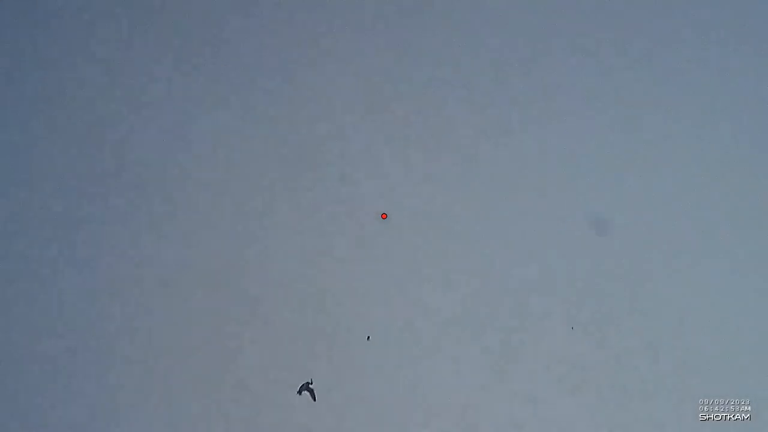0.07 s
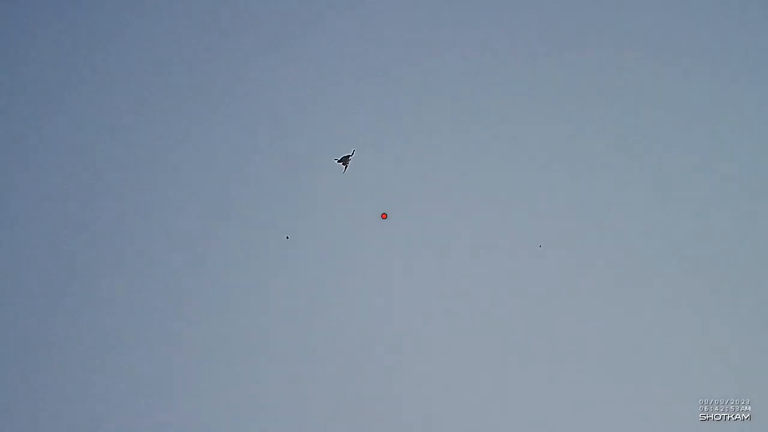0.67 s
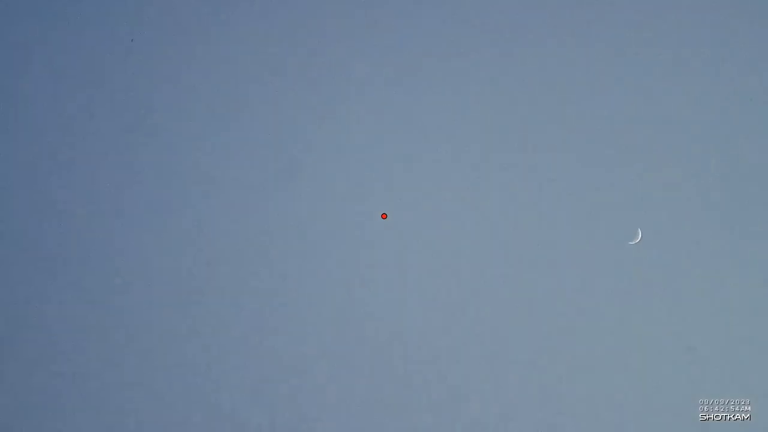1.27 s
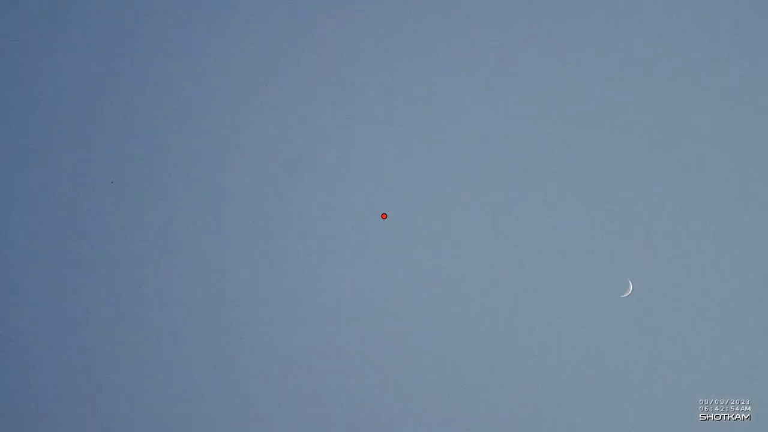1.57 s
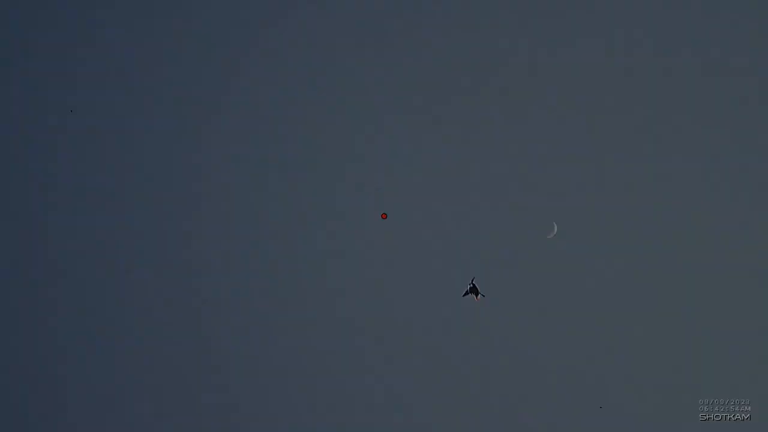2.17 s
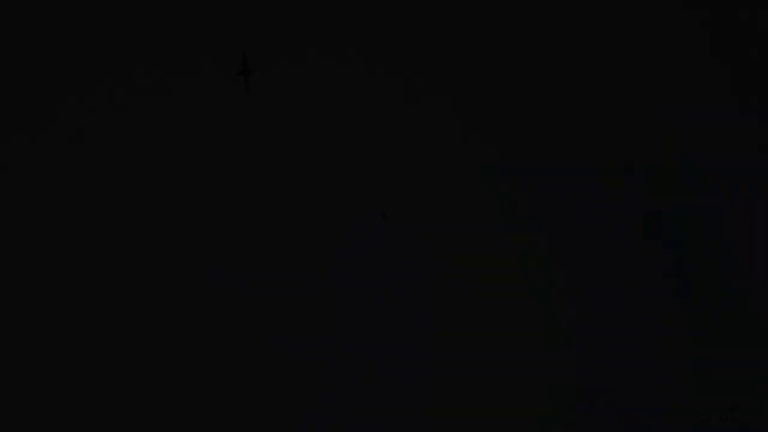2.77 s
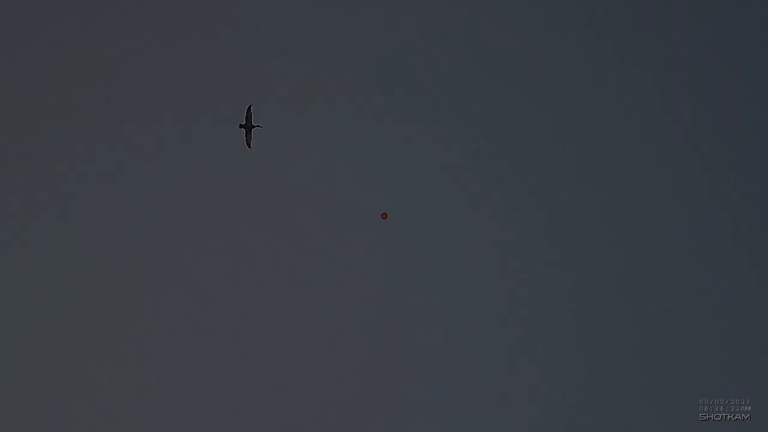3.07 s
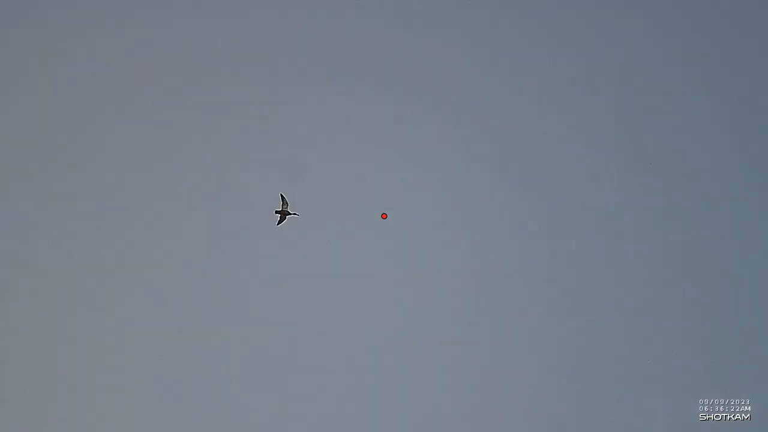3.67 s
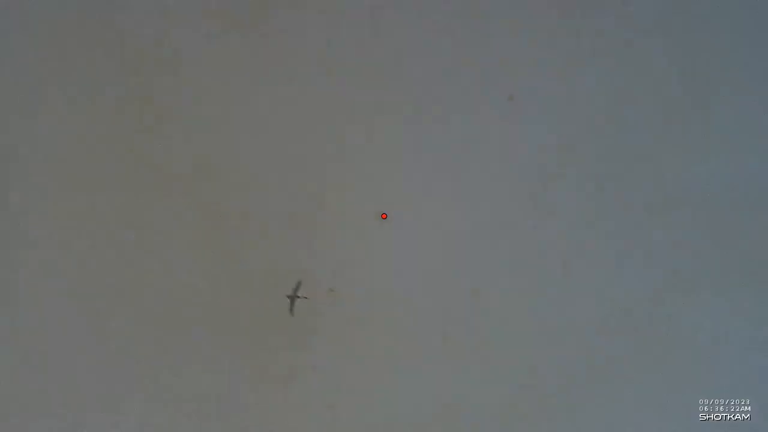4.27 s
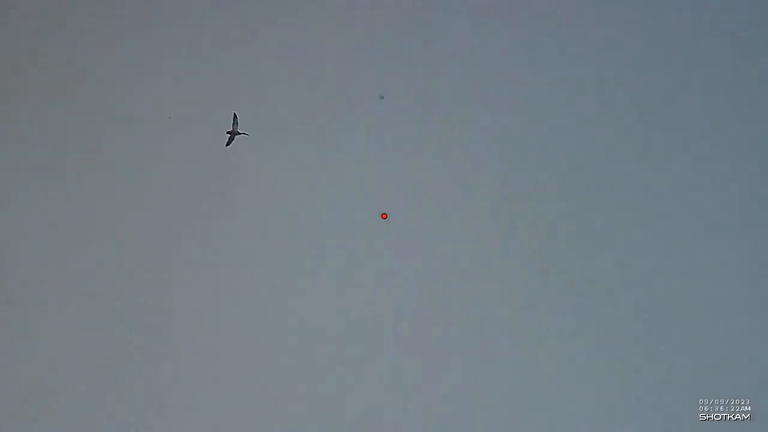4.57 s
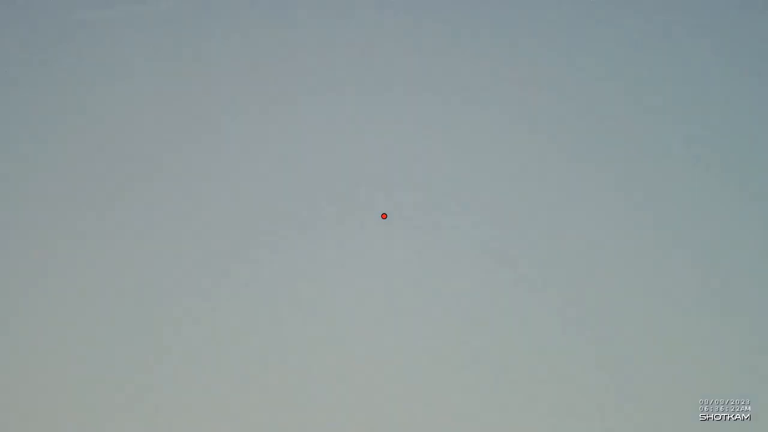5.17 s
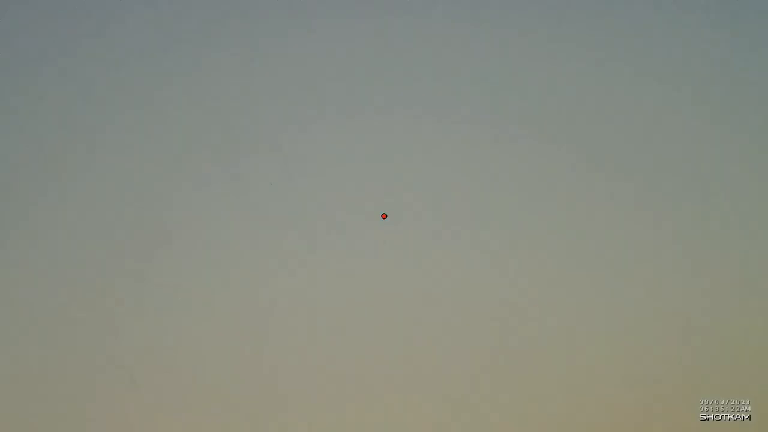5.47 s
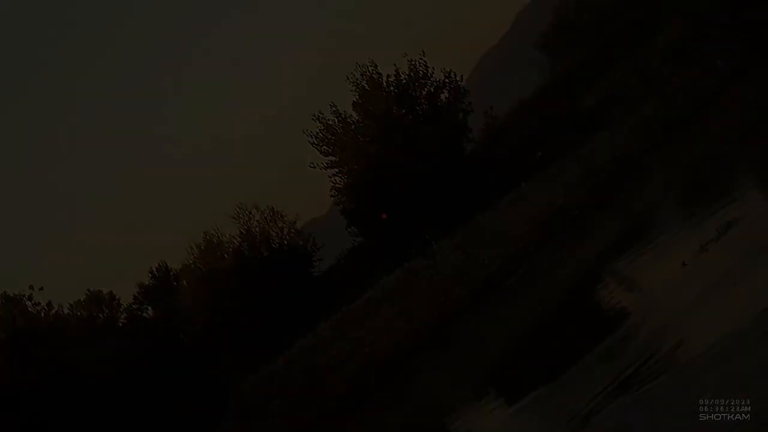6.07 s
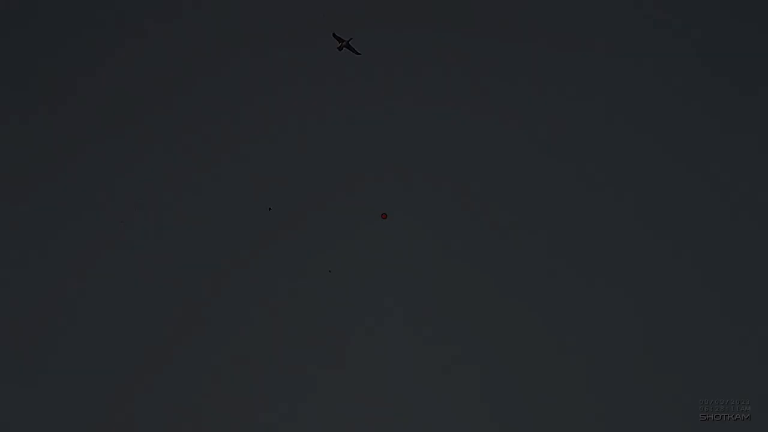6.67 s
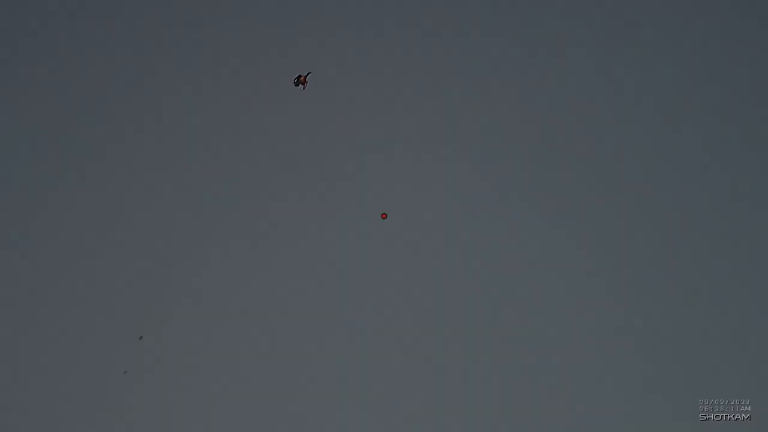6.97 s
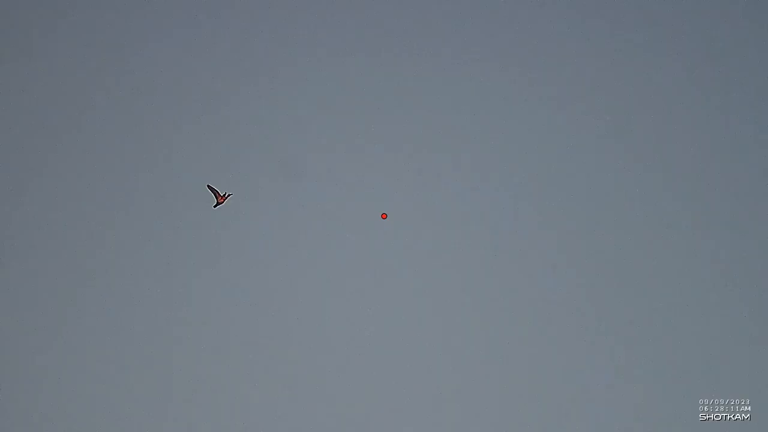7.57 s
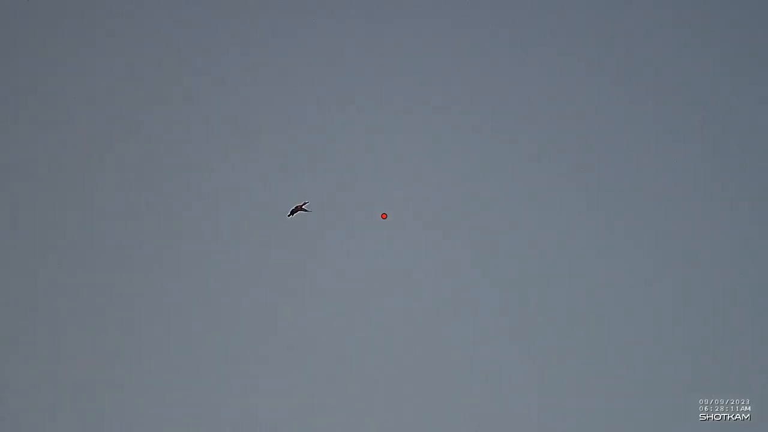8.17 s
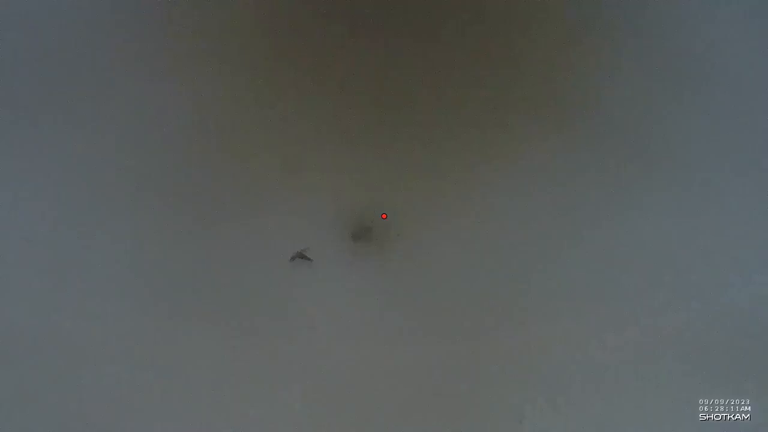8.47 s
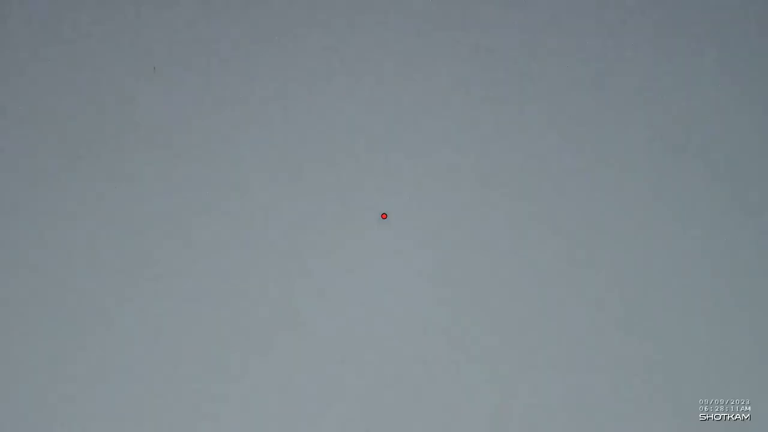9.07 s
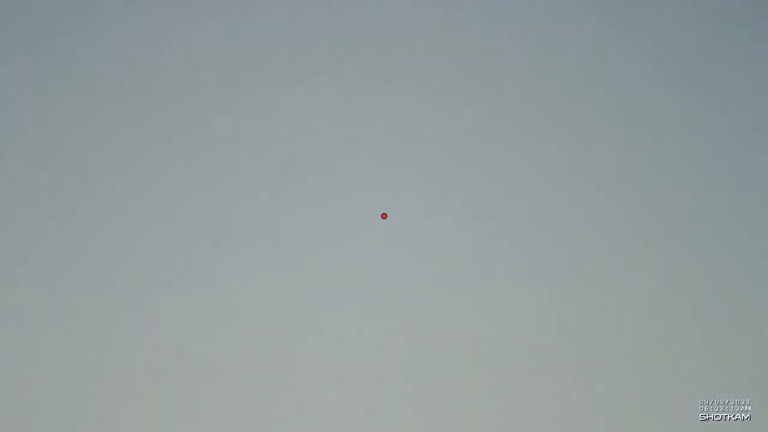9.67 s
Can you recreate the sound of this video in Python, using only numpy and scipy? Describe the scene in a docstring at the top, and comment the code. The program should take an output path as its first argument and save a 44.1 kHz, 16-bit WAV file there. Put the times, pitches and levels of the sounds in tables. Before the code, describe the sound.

In quiet open country, a shot's tail dies away with a thin steel ring. Another gun booms nearby and far guns thud. After a brief fade, a close shotgun blast overloads the barrel-mounted microphone, the action clacks and echoes roll away. Hands knock and click on the gun. Following another fade come a nearby shot, a second close blast and one last nearby boom.

```python
"""Open country during a bird shoot, heard from a small camera clamped to a shotgun barrel.
Over quiet air, far guns thud and shots roll across the land. Hands knock and click on the gun,
and other guns nearby boom through the camera housing. The gun's own three blasts overload the
microphone, cycle the action and leave a thin steel ring. Twice the sound fades out and cuts back in."""
import sys
import numpy as np
from scipy import signal
from scipy.fft import rfft, irfft
from scipy.io import wavfile

SR = 44100
rng = np.random.default_rng(int(sys.argv[2]) if len(sys.argv) > 2 else 0)


def master(y):
    """Save y as 16-bit WAV."""
    cut = np.clip(np.atleast_2d(y).T, -1, 1)
    pcm = np.round(cut * 32767)  # scale
    wavfile.write(sys.argv[1], SR, pcm.astype(np.int16))


N = 437472
TIME = np.arange(N) / SR


def from_db(db):
    """Decibels to gain."""
    return 10 ** (np.asarray(db) / 20)


def unit_rms(x):
    """Scale to rms 1."""
    return x / np.sqrt(np.mean(x ** 2) + 1e-20)


def add(out, start, sound):
    """Mix a sound in at a start time in seconds."""
    at = round(start * SR)
    first, last = max(at, 0), min(at + len(sound), N)
    if last > first:
        out[first:last] += sound[first - at:last - at]


def decay(t, t60):
    """Exponential fall, 60 dB in t60 seconds."""
    return np.exp(-np.log(1000) * t / t60)


def bursts(rows, rise):
    """Envelope of events (start, dB, t60) that swell with time constant rise and die away."""
    out = np.zeros(N)
    for start, db, t60 in rows:
        t = TIME[:int(2 * t60 * SR)]
        add(out, start, from_db(db) * (1 - np.exp(-t / rise)) * decay(t, t60))
    return out


def dull(x, hz):
    """Two-pole low-pass."""
    return signal.sosfilt(signal.butter(2, hz, fs=SR, output="sos"), x + 1e-18)


def resonance(x, hz, width):
    """Two-pole resonance with gain 1 at its peak."""
    radius = np.exp(-np.pi * width / SR)
    feedback = [1, -2 * radius * np.cos(2 * np.pi * hz / SR), radius ** 2]
    return signal.lfilter(np.array([1, 0, -1]) * (1 - radius ** 2) / 2, feedback, x + 1e-18)


# Noise colours: deep rumble, midrange body, bright crack. Each row: frequency in Hz, relative level in dB.
RUMBLE = [(12, -4.5), (30, 1), (55, 2), (120, -4), (200, -22.5), (500, -60)]
MIDRANGE = [(500, -9.5), (850, 7.5), (1200, 5), (1500, -3.5), (2100, -3), (3000, -19.5), (4500, -31),
            (7500, -44)]
CRACK = [(300, -7), (700, 0.5), (1300, -5.5), (2500, -12.5), (4200, -16.5), (5800, -26), (7000, -25),
         (8200, -43)]

def noise(spectrum):
    """Noise of the given colour, rms 1."""
    hz, db = np.transpose(spectrum)
    bins_hz = np.maximum(np.fft.rfftfreq(N, 1 / SR), 1)
    gain = from_db(np.interp(np.log(bins_hz), np.log(hz), db))
    return unit_rms(irfft(rfft(rng.standard_normal(N)) * gain, N))


# The boxy tone of the camera housing. Each row: pitch in Hz, width in Hz, gain in dB.
HOUSING_MODES = [(111, 28, -25.5), (213, 28, 14.5), (283, 19, -9.5), (632, 51, 6.5), (787, 37, -21.5),
                 (1213.7, 30, -25), (1970, 48, -30.5), (2750, 100, -35), (3520, 310, -47),
                 (5070, 3300, -44.5)]

def housing(x):
    """Airborne sound reaches the microphone through the housing's resonances."""
    return sum(from_db(db) * resonance(x, hz, width) for hz, width, db in HOUSING_MODES)


def boom(top_hz=3800):
    """Diffuse sound heard through the housing, rms 1."""
    return unit_rms(dull(housing(rng.standard_normal(N)), top_hz))


# The housing's hollow mids. Each row: pitch in Hz, width in Hz, relative level in dB.
HOLLOW_MODES = [(654, 98, 0), (1140, 140, -8), (2020, 47, -11), (2750, 130, -19), (3520, 300, -27)]

def hollow():
    """Noise in the housing's middle resonances, mixed in alternating polarity, rms 1."""
    white = rng.standard_normal(N)
    return unit_rms(sum((-1) ** k * from_db(db) * resonance(white, hz, width)
                        for k, (hz, width, db) in enumerate(HOLLOW_MODES)))


# A soft bed of hiss. Each row: frequency in Hz, relative level in dB.
HISS = [(200, 4.5), (1500, -2), (3000, -3), (6000, -2.5), (7500, -6.5), (9000, -11.5)]
# Gusts as the barrel is swung or jolted. Each row: peak time in seconds, level in dB,
# half length in seconds.
SWINGS = [(.81, -39.5, 0.13), (1.105, -49.5, 0.061), (1.8, -47, 0.027), (5.484, -55.5, 0.17),
          (5.664, -43, 0.045), (6.967, -46.5, 0.028), (7.497, -63, 0.031), (9.55, -50, 0.048)]

def air(calm_db=-72, calm_mids_db=-85, breeze_db=-78, sway_db=-47, hiss_db=-79):
    """Quiet country air, wind pushing on the swinging barrel and a faint steady hiss."""
    calm = from_db(calm_db) * boom() + from_db(calm_mids_db) * noise(MIDRANGE)
    gusts = sum(from_db(db) * np.exp(-((TIME - peak) / half) ** 2) for peak, db, half in SWINGS)
    wind = (from_db(breeze_db) + gusts) * noise(RUMBLE)
    # slow pressure swells as the gun swings
    sway = from_db(sway_db) * noise([(1, 3), (4, -7), (10, -24), (30, -62.5), (100, -110)])
    return calm + wind + sway + from_db(hiss_db) * noise(HISS)


# Lingering roll of earlier shots, still sounding as the scene cuts back in.
# Each row: start in seconds, level in dB, swell in seconds.
LINGERING_ROLLS = [(2.8, -64, 0.32), (6.4, -55.5, .2), (6.95, -54, 0.29)]

def roll_envelope(t60, swell_s=.095):
    """The swell and fall of the sound that the land scatters back after a shot."""
    fresh = bursts([(start, db, t60) for start, *_, db in OWN_SHOTS + NEAR_SHOTS], rise=swell_s)
    return fresh + sum(bursts([(start, db, t60)], rise=swell) for start, db, swell in LINGERING_ROLLS)


# The flutter of unevenly arriving echoes. Each row: rate in Hz, relative depth in dB.
ROLL_FLUTTER = [(2, -8), (6, 0.5), (18, -3.5), (40, -30), (200, -87.5)]

def land_roll(low_t60=3.1, mids_t60=2.0, mids_top_hz=2400, flutter_db=1.5):
    """Shots roll unevenly over the country, dulled by distance; the mids die before the lows."""
    mids = from_db(-18) * noise(MIDRANGE) + from_db(-8) * hollow()
    mids = dull(dull(mids, mids_top_hz), mids_top_hz)
    lows = boom(top_hz=1500) + from_db(-8) * noise(RUMBLE)
    roll = roll_envelope(low_t60) * lows + roll_envelope(mids_t60) * mids
    return roll * from_db(flutter_db * noise(ROLL_FLUTTER))


# Far guns. Each row: start in seconds, level in dB.
FAR_SHOTS = [(1.099, -44.5), (1.226, -42.5), (1.787, -49.5), (2.34, -61.5), (3.028, -67.5), (3.12, -60),
             (5.578, -46), (9.508, -49.5)]
# The land's answer to each of the gun's own shots. Each row: delay in seconds,
# level in dB relative to the roll, swell in seconds, t60 in seconds.
ECHOES = [(0.383, 7.5, 0.044, 0.4), (.543, -1.5, 0.015, 0.23), (.85, -1.5, 0.11, 1.1)]

def far_thuds(shot_t60=.43, mids_db=-20):
    """Far guns and single echoes arrive as thuds, dulled by distance."""
    envelope = bursts([(start, db, shot_t60) for start, db in FAR_SHOTS], rise=.011)
    for delay, echo_db, swell, t60 in ECHOES:
        envelope += bursts([(start + delay, db + echo_db, t60) for start, *_, db in OWN_SHOTS], swell)
    body = unit_rms(resonance(boom(), hz=380, width=340))
    return envelope * (body + from_db(mids_db) * noise(MIDRANGE))


# Light steel clicks. Each row: start in seconds, level in dB before the trim.
CLICKS = [(0.2997, -48), (0.3267, -45), (0.9876, -37.5), (1.0044, -43), (1.122, -45.5), (1.321, -55),
          (3.63, -59.5), (4.6828, -41), (4.944, -58), (5.58, -43), (6.625, -57), (6.742, -64), (6.959, -30),
          (8.8964, -43), (9.3235, -39), (9.331, -38.5)]

def clicks(trim_db=-4, t60=.017, ring_hz=2900, ring_db=-26.5, ring_t60=.17):
    """Small steel parts tick with a bright, short chink and ring on faintly."""
    steel = noise([(900, -29), (2000, -6), (2800, -10.5), (3450, .5),
                   (4500, -18), (5500, -17.5), (7200, -27.5), (8500, -50)])
    chink = bursts([(start, db + trim_db, t60) for start, db in CLICKS], rise=.0012)
    ring = bursts([(start, db + ring_db, ring_t60) for start, db in CLICKS], rise=.0008)
    return chink * steel + ring * np.sin(2 * np.pi * ring_hz * TIME)


# Hands on the stock and action. Each row: start in seconds, relative level in dB, clink boost in dB.
HAND_KNOCKS = [(0.423, -43, 19), (0.595, -36, 13), (0.636, -48, 24), (0.663, -20, 9.5), (1.186, -40.5, 5),
               (3.055, -64, 8), (3.128, -61, 12), (4.892, -42.5, 12.5), (5.11, -38, 4), (5.213, -27.5, -7),
               (5.573, -39.5, 10), (5.659, -44, 19), (5.748, -41, 4.5), (6.13, -57.5, 0), (6.778, -50, 5.5),
               (6.954, -28, 8.5), (6.96, -28.5, 13.5), (7.493, -50.5, -1), (8.594, -49, 17),
               (9.193, -33, 0), (9.212, -38, 17), (9.453, -36.5, 4), (9.528, -40.5, 2)]

def hand_blows(grit_db=-11, t60=.032):
    """Hands knock on the gun: blows as (start, dB, clink dB, grit dB, t60)."""
    return [(start, db, clink_db, grit_db, t60) for start, db, clink_db in HAND_KNOCKS]


def housing_thumps(trim_db=-17, t60=.089):
    """Each knock of the hands also jolts the camera housing."""
    envelope = bursts([(start, db + trim_db, t60) for start, db, _ in HAND_KNOCKS], rise=.0029)
    return envelope * unit_rms(resonance(boom(), hz=160, width=300))


# The bolt slides back, hits its stop, rebounds, lifts a shell and closes. Each row: seconds from the
# microphone's release, relative level in dB, grit boost in dB.
ACTION_CYCLE = [(-.005, -22.5, 21), (0, -7, 7.5), (.007, -16.5, 27.5), (.028, -29.5, 24.5),
                (.045, -18.5, 16.5)]

def action_blows(clink_db=2.5, t60=.021):
    """The action cycles after each shot: blows as (start, dB, clink dB, grit dB, t60)."""
    return [(start + blocked + delay, db, clink_db, grit_db, t60)
            for start, _, blocked, *_ in OWN_SHOTS for delay, db, grit_db in ACTION_CYCLE]


# The clack of the knocked gun. Each row: pitch in Hz, relative level in dB, multiple of the blow's t60.
GUN_MODES = [(404, -6.5, 1.1), (553, 4.5, .9), (659.5, 1, 1.9), (753.6, 1, 2), (943, -14, .9),
             (1144.8, -16, 1), (1200, -16, 0.37), (1580, -8, 0.75), (1585, -9.5, 0.51), (1850, -22, .6),
             (2090, -20, 0.18), (2850, -13, 0.28), (3730, -23, .4)]

def gun_knocks(blows, trim_db=-7, centre_hz=760, clink_hz=1460, clink_octaves=.36, spread_db=.5,
               detune=.017, chatter=.28, chatter_per_s=2500, grit_trim_db=-17, grit_t60=.012):
    """A blow rings the gun and loose parts chatter; where it lands shifts each mode's level and pitch."""
    out, t = np.zeros(N), TIME[:SR // 5]
    hz, mode_db, t60_scale = np.transpose(GUN_MODES)[:, :, None]
    colour_db = mode_db - 4 * np.abs(np.log2(hz / centre_hz))  # 4 dB less per octave off centre
    steel_band = np.exp(-(np.log2(hz / clink_hz) / clink_octaves) ** 2)
    for start, db, clink_db, _, t60 in blows:
        strength = from_db(colour_db + clink_db * steel_band + spread_db * rng.standard_normal(hz.shape))
        pitch = hz * (1 + detune * rng.standard_normal(hz.shape))
        modes = strength * np.sin(2 * np.pi * (pitch * t + rng.random(hz.shape)))
        ringing = (modes * decay(t, t60 * t60_scale)).sum(axis=0) * (1 - np.exp(-t / .00017))
        touches = chatter * rng.standard_normal(len(t)) * decay(t, t60=.068)
        touches *= rng.random(len(t)) < chatter_per_s / SR
        touches[0] = 1  # the blow itself
        add(out, start, from_db(db + trim_db) * signal.fftconvolve(touches, ringing))
    grit = [(start, db + grit_db + grit_trim_db, grit_t60) for start, db, _, grit_db, _ in blows]
    return out + bursts(grit, rise=.0012) * noise(CRACK)


# Other guns nearby. Each row: start in seconds, pulse in dB ahead of the housing, ground bounce lag in
# seconds, crack in dB, tail in dB, tail t60 in seconds, roll in dB.
NEAR_SHOTS = [(0.8561, 26, .0045, -30, -26.5, 0.34, -43.5), (8.411, 17.5, .0045, -36.5, -37, 0.3, -50),
              (9.78, 32, 0.001424, -21, -14, 0.23, -33.5)]

def near_shots(crack_t60=.022, bounce_db=-6, pulse_top_hz=1900):
    """A pressure pulse, rounded by distance, and its ground bounce ring the housing; scatter follows."""
    pulses = np.zeros(N)
    for start, db, bounce_lag, *_ in NEAR_SHOTS:
        add(pulses, start, -from_db([db]))
        add(pulses, start + bounce_lag, -from_db([db + bounce_db]))
    crack = bursts([(start - .002, db, crack_t60) for start, _, _, db, *_ in NEAR_SHOTS], rise=.00077)
    tail = bursts([(start, db, t60) for start, *_, db, t60, _ in NEAR_SHOTS], rise=.006)
    snap = noise(CRACK) + from_db(-4) * noise(MIDRANGE) + from_db(6) * hollow()
    scatter = boom() + from_db(-5) * hollow() + from_db(-26) * noise(CRACK) + from_db(-8) * noise(RUMBLE)
    return housing(dull(pulses, pulse_top_hz)) + crack * snap + tail * scatter


# The barrel's thin ring. Each row: start in seconds, level in dB, lower and upper mode in relative dB.
BARREL_RINGS = [(0, -44.5, -12.5, -1.5), (2.925, -82, -11, -9.5), (4.46, -49.5, -5, -9),
                (6.598, -64.5, -5, -2.5), (8.76, -47.5, -3, -6)]
# Its brief shimmer. Each row: pitch in Hz, level in dB relative to a ring at fresh_db, t60 in seconds.
BARREL_OVERTONES = [(3370, -7, .35), (3220, -14.5, .3), (5140, -22.5, .5)]

def barrel_ring(main_hz=2482, lower_hz=2466, upper_hz=2540, ring_t60=1.88, fresh_db=-43):
    """Three close steel modes beat as they die slowly; the quieter the ring, the purer its tone."""
    out, t = np.zeros(N), TIME[:3 * SR]
    for start, db, lower_db, upper_db in BARREL_RINGS:
        modes = [(main_hz, 0, ring_t60), (lower_hz, lower_db, ring_t60), (upper_hz, upper_db, ring_t60)]
        modes += [(hz, level + db - fresh_db, t60) for hz, level, t60 in BARREL_OVERTONES]
        for hz, level, t60 in modes:
            add(out, start, from_db(db + level) * np.sin(2 * np.pi * hz * t) * decay(t, t60))
    return out


# The blast's heavy low end. Each row: frequency in Hz, relative level in dB.
BLAST = [(40, -4.5), (100, -2.5), (190, 0.5), (300, -10), (660, -15), (1200, -29), (3000, -43), (8000, -57)]
# The microphone's lurch and recovery. Each row: seconds from its release, offset with full scale as 1.
MIC_RECOVERY = [(-.085, 0), (-.078, -.6), (-.05, -1.5), (-.035, -1.2), (-.018, -.68), (-.005, -.55),
                (.004, .2), (.024, .42), (.06, .24), (.095, .09), (.19, .07), (.37, -.03), (.8, 0)]
# The gun's own shots, the first just before the scene opens. Each row: start in seconds, blast in dB
# before overload, seconds until the blocked microphone releases, tail in dB, roll in dB.
OWN_SHOTS = [(-.125, 14, 0.071, -24.5, -44), (4.3959, 12.5, 0.082, -22.5, -44),
             (8.6679, 9.5, 0.083, -22, -43.5)]

def own_shots(shake_s=.042, howl_hz=680, howl_db=7, whip_hz=54, rattle_db=-2, rattle_per_s=260,
              tail_t60=.33, spray_db=-13, spray_t60=.1):
    """The blast sets the housing howling; the recoil shakes it so hard that the microphone blocks."""
    out, shake, t = np.zeros(N), np.zeros(N), TIME[:SR]
    recoil_times = [0, .007, shake_s * .8, shake_s, shake_s + .004, shake_s + .03]
    recoil = np.interp(t, recoil_times, [.05, 1, .85, .5, .04, 0])
    howl = from_db(howl_db) * np.sin(2 * np.pi * howl_hz * t) * decay(t, t60=.081)
    # the barrel whips up and down at its lowest bending mode
    whip = -np.sin(2 * np.pi * whip_hz * np.maximum(t - .007, 0))
    for start, db, blocked, *_ in OWN_SHOTS:
        offset = np.interp(t - blocked, *np.transpose(MIC_RECOVERY))
        add(out, start, howl + from_db(db) * recoil * whip + offset)
        add(shake, start, from_db(db) * recoil)
    # the mount chatters in bursts about a millisecond long
    contacts = rng.random(N) < rattle_per_s / SR
    rattle = signal.lfilter([1], [1, -np.exp(-1 / (.00083 * SR))], contacts + 1e-18)
    out += shake * (noise(BLAST) + from_db(rattle_db) * rattle * noise(CRACK))
    # the report's bright spray dies before its booming tail
    releases = [(start + blocked, db) for start, _, blocked, db, _ in OWN_SHOTS]
    tail = bursts([(start, db, tail_t60) for start, db in releases], rise=.0065)
    spray = bursts([(start, db + spray_db, spray_t60) for start, db in releases], rise=.0018)
    return out + tail * (boom() + noise(RUMBLE)) + spray * noise(CRACK)


def scene():
    """Everything that reaches the one microphone."""
    shots = own_shots() + near_shots() + barrel_ring()
    handling = gun_knocks(action_blows() + hand_blows()) + housing_thumps() + clicks()
    country = land_roll() + far_thuds() + air()
    return (shots + handling + country)[None]


# Fader moves; the last fade lies past the end. Each row: cut-in, fade start and fade end in seconds.
FADES = [(-1, 2.05, 2.66), (2.925, 5.75, 6.4), (6.597, 11, 12)]

def record(dry, rail=.66, pop_height=.034, cutoff_hz=8400):
    """The microphone overloads almost flat; the sound fades and cuts back in, and its top is cut."""
    overloaded = np.clip(dry, -rail, rail)
    overloaded += .02 * np.tanh((dry - overloaded) / 2)
    add(overloaded[0], FADES[-1][0], pop_height * decay(TIME[:SR], t60=.7))  # the last cut-in pops
    fader = sum((TIME >= start) * np.interp(TIME, [fade, end], [1, 0]) for start, fade, end in FADES)
    lowpass = signal.butter(12, cutoff_hz, fs=SR, output="sos")
    filtered = signal.sosfilt(lowpass, overloaded * fader)
    # the filter overshoots on the square edges, and the next stage flattens that too
    return signal.sosfiltfilt(lowpass, np.clip(filtered, -.8, .8))


dry = scene()
out = record(dry)
master(out)
```